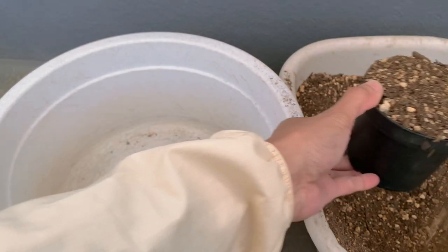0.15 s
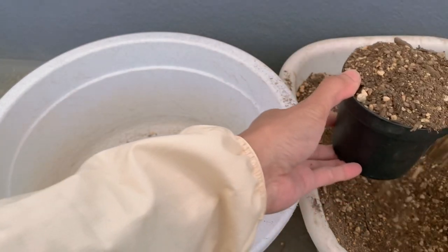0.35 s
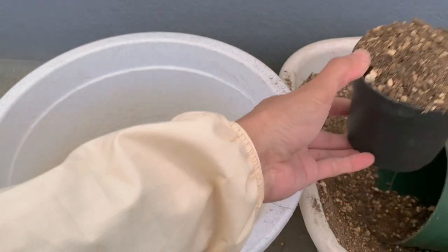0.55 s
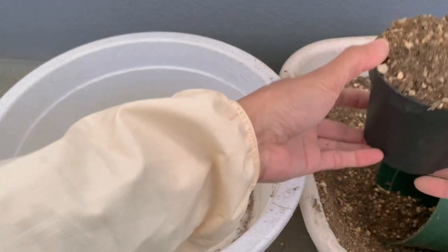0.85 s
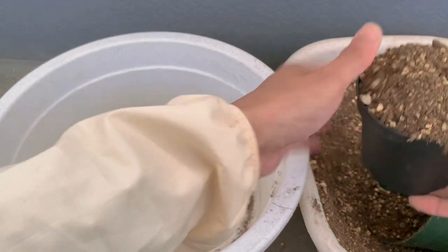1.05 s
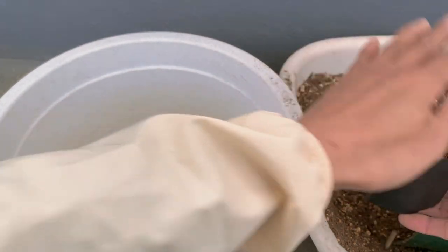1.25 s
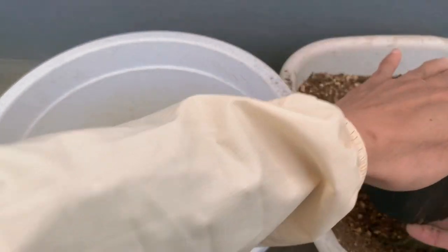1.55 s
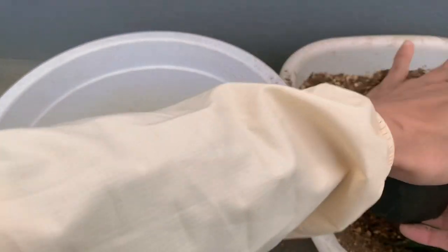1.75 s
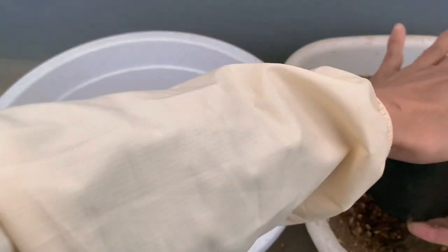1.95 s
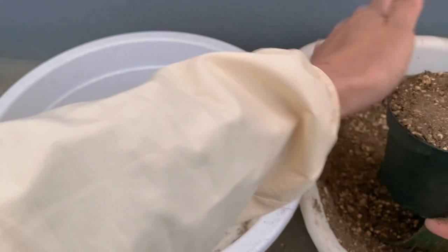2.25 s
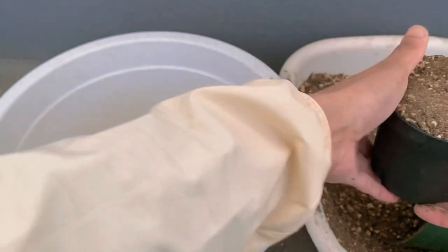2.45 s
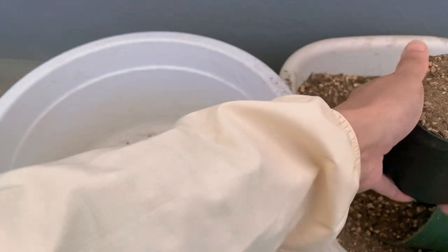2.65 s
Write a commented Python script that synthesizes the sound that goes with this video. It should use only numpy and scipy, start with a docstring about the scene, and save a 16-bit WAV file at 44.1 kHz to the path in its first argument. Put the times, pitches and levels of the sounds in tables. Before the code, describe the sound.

Dry soil slides and ticks against a hollow plastic pot, the pot is knocked softly, then after a lull sharp grit cracks and muffled hand rubs come thickly before fading; heard close, slightly right, in a small room.

```python
"""Potting mix pressed into a pot

Gritty potting mix is scooped into a small plastic pot and pressed down by hand, in a small room.
Grit cracks and scrapes as short bursts of random clicks, coloured by the pot's resonances and heard from
the right. Soil slides are swelling streams of tiny clicks with pitched pebble ticks. The scoop bumps the
pot once: dying sine waves. Filtered noise and wavering low tones make the rubs, the arm, the hum and the air.
"""
import sys
import numpy as np
from scipy import signal
from scipy.fft import rfft, irfft, next_fast_len
from scipy.io import wavfile
from scipy.ndimage import map_coordinates

SR = 44100
rng = np.random.default_rng(int(sys.argv[2]) if len(sys.argv) > 2 else 0)


def put_to_file(sound):
    """Save the sound as 16-bit audio at rate SR, in the file named by the first command-line argument."""
    columns = np.atleast_2d(sound).T  # one column per channel
    safe = np.clip(columns, -1, 1)
    whole_steps = np.round(safe * 32767)
    wavfile.write(sys.argv[1], SR, whole_steps.astype(np.int16))


N = 123479  # samples, 2.8 s


def amp(db):
    """Decibels to gain."""
    return 10 ** (np.asarray(db) / 20)


def unit(x):
    """Scale to an rms of 1."""
    return x / np.sqrt(np.mean(x ** 2) + 1e-20)


def along(points, hz):
    """Read a table of (Hz, value) points on a log frequency axis."""
    f, v = np.transpose(points)
    return np.interp(np.log(hz + 1), np.log(f + 1), v)


def curve(rows):
    """Turn (seconds, value) points into one value per sample."""
    return np.interp(np.arange(N) / SR, *np.transpose(rows))


def wobble(rate):
    """A smooth random curve through `rate` random points a second."""
    return map_coordinates(rng.standard_normal(1024), [np.arange(N) * rate / SR], mode="wrap")


def random_sizes(shape):
    """Bell-shaped random numbers, limited to -2..2."""
    return np.clip(rng.standard_normal(shape), -2, 2)


def decay(t, t60):
    """Die away by 60 dB in t60 seconds."""
    return np.exp(-np.log(1000) * t / t60)


def filtered(x, response):
    """Multiply the spectrum of x by a response given as a function of Hz."""
    n = x.shape[-1]
    padded = 2 * next_fast_len(n // 2 + 2048)
    hz = np.fft.rfftfreq(padded, 1 / SR)
    return irfft(rfft(x, padded) * response(hz), padded)[..., :n]


def coloured(x, tone_db):
    """Filter with the gain tone_db(hz), sounding only after each click and never before it."""
    def response(hz):
        # Folding the cepstrum forward in time gives the minimum-phase filter.
        cepstrum = irfft(tone_db(hz) * np.log(10) / 20)
        half = len(cepstrum) // 2
        cepstrum[1:half] *= 2
        cepstrum[half + 1:] = 0
        return np.exp(rfft(cepstrum))
    return filtered(x, response)


def add(track, s, sound):
    """Mix a sound into the track at time s."""
    i = max(0, round(s * SR))
    track[..., i:i + sound.shape[-1]] += sound[..., :max(0, N - i)]


SWELL_EDGE = 2.76  # how steeply a swell starts and ends


def swell(s, half):
    """A smooth rise and fall that peaks at time s and is at half height `half` seconds away."""
    return 1 / (1 + np.abs((np.arange(N) / SR - s) / half) ** SWELL_EDGE)


# Resonances of the plastic pot. Each row: pitch in Hz, width in Hz, lift (or cut, if negative) in dB.
POT_RESONANCES = [(437, 94, 8.5), (979.5, 24, 6.5), (1214, 97, 4), (1800, 52, 4.5), (1930, 110, 1.5),
                  (4850, 760, -1.5), (5644, 950, -8.5), (10030, 1100, 7.5)]


def pot_db(hz):
    """The pot's walls and hollow strengthen some pitches and weaken others."""
    return sum(db / (1 + (2 * (hz - f) / width) ** 2) for f, width, db in POT_RESONANCES)


# Grit cracking on plastic. Each row: start in seconds, level in dB before CRACK_DB, swell time in seconds,
# lift of the hollow body in dB, lift of the top in dB, pitch of the snap in Hz.
CRACK_EVENTS = [(.034, -28, 0.00028, -2, -35, 4780), (0.194, -38, 0.0012, 15, 8, 1260),
                (.203, -34, 0.00088, 18.5, 5, 1690), (0.2422, -23, 0.00087, 10, 0.5, 1100),
                (0.311, -34.5, 0.0054, 5, -3, 950), (0.4284, -9, 0.0042, -5.5, 1, 6000),
                (.4365, -15, .0018, 3.5, -8, 1230), (0.5287, -30.5, 0.00099, 8, -27, 5770),
                (.545, -46, 0.00041, -5, -15, 10900), (0.635, -37, 0.0065, 1, 7, 6500),
                (0.8973, -36, 0.00037, -28, 3, 10900), (1.2267, -11, 0.0006, -12, 6, 7200),
                (1.268, -23.5, 0.0009, -1.5, -2.5, 10600), (1.4351, -14, 0.00088, -2, 12.5, 6440),
                (1.4376, -27.5, 0.0016, 13.5, 2, 1000), (1.4794, -26.5, 0.00031, -2, 6, 10100),
                (1.4849, -22.5, 0.0013, 3, 0.5, 4040), (1.538, -29, 0.00016, -2, 2.5, 12500),
                (1.560, -26.5, 0.00072, -5.5, -1, 2010), (1.5744, -27, 0.00069, -10, -21, 11000),
                (1.59, -24, 0.00024, -8, 5, 11700), (1.605, -23, 0.00071, -4.5, -37, 3030),
                (1.7435, -25.5, 0.00042, -4, -17.5, 10600), (1.82, -26, 0.00095, -1, 4, 4600),
                (1.8629, -17, 0.0015, 4.5, -6, 1060), (1.8695, -14.5, 0.0015, 2.5, 0.5, 2800),
                (1.904, -18.5, 0.0004, -39, -3.5, 7100), (1.9273, -18.5, 0.0002, -56, -9, 9800),
                (1.956, -31, 0.0045, 3.5, 3, 2300), (2.061, -23.5, 0.00034, -5, 3, 12330),
                (2.165, -15, 0.00028, -3, 5, 7600), (2.222, -21, 0.0013, -7.5, 3.5, 3400),
                (2.228, -27, 0.00086, -26, 1, 9900), (2.241, -18.5, 0.0023, -13, -3.5, 6750),
                (2.2485, -21, 0.0005, -4.5, 3, 6500), (2.258, -22, 0.002, -40, 1.5, 6400),
                (2.325, -19, 0.0033, -7.5, -5, 10400), (2.336, -7.5, 0.001, -14.5, 0, 5500),
                (2.385, -25, 0.0013, -12, 1, 5950), (2.4193, -18, 0.00082, -8.5, -8, 8800),
                (2.4696, -16, 0.0016, -6, 8, 2000), (2.5331, -7.5, 0.00012, -23, 6, 5700),
                (2.674, -41.5, 0.00086, -22, 2, 6740)]
# Tone shared by all cracks. Each row: frequency in Hz, gain in dB.
CRACK_COLOUR = [(150, -14), (350, -4.5), (750, -4), (1100, -2.5), (2500, 0.5), (4000, 4.5), (6000, 4.5),
                (8500, -6.5), (11500, -4.5), (14500, -2), (16000, -17.5)]
CRACK_DB = 0.5
BODY_HZ, TOP_HZ = 2590, 8570  # the body lies below the first, the top above the second
SNAP_DB, SNAP_OCTAVES = 8, 0.17  # lift around the snap pitch, and its half width
FADE_S, FADE_PER_SWELL = 0.0011, 0.84  # a slower crush also dies more slowly
FRACTURE_SHARE = 0.21  # share of a burst's energy given to its main fracture, before shaping the tone
FRACTURE_SPREAD_DB = 3  # scatter in size of the tiny fractures


def cracks():
    """Tiny fractures swell to one main fracture and die in milliseconds, each crack with its own echoes."""
    out = np.zeros((2, N))
    t = np.arange(2048) / SR
    for s, db, rise, body_db, top_db, snap_hz in CRACK_EVENTS:
        fade = np.exp(-np.maximum(t - rise, 0) / (FADE_S + FADE_PER_SWELL * rise))
        shape = np.minimum(t / rise, fade)
        signs = np.sign(rng.standard_normal(len(t)))
        burst = shape * signs * amp(FRACTURE_SPREAD_DB * random_sizes(len(t)))
        burst *= np.sqrt(1 - FRACTURE_SHARE) / np.linalg.norm(burst)
        burst[np.argmax(shape)] = np.sqrt(FRACTURE_SHARE)
        burst *= np.linalg.norm(shape)

        def tone_db(hz):
            body = body_db / (1 + (hz / BODY_HZ) ** 4)
            top = top_db * (1 - 1 / (1 + (hz / TOP_HZ) ** 6))
            octaves_away = np.log2((hz + 1) / snap_hz)
            snap = SNAP_DB / (1 + (octaves_away / SNAP_OCTAVES) ** 2)
            return along(CRACK_COLOUR, hz) + pot_db(hz) + body + top + snap

        add(out, s, amp(db + CRACK_DB) * placed(coloured(burst, tone_db)))
    return out


GRAINS_PER_S, GRAIN_SPREAD_DB = 2000, 5


def grains():
    """Countless tiny collisions of widely varying size, as clicks at random moments."""
    hit = rng.random(N) < GRAINS_PER_S / SR
    signs = np.sign(rng.standard_normal(N))
    return hit * signs * amp(GRAIN_SPREAD_DB * random_sizes(N))


# Soil sliding and tumbling. Each row: peak time in seconds, level in dB before SLIDE_DB,
# half length in seconds, drumming on the pot in dB relative to the rustle.
SLIDE_EVENTS = [(.005, -44, 0.022, -3.5), (0.23, -47, 0.063, 3.5), (0.257, -47.5, 0.0058, -0.5),
                (0.305, -45.5, 0.014, -8.5), (0.471, -43.5, 0.038, -0.5), (0.559, -62, 0.02, 4),
                (0.651, -43.5, 0.015, -1), (0.706, -60, 0.027, 1), (0.791, -45.5, .025, -8.5),
                (0.849, -49.5, 0.0062, -1), (0.932, -45.5, 0.011, -25), (1.153, -52, 0.038, -6.5),
                (1.24, -44, 0.035, -5), (1.468, -46, 0.049, -3), (1.614, -48.5, 0.03, -9),
                (1.699, -43.5, 0.015, -2.5), (1.847, -47.5, 0.057, -2), (1.965, -44, 0.0143, -3),
                (2.186, -45.5, 0.086, -7.5), (2.253, -46.5, 0.037, -12.5), (2.344, -41.5, 0.034, -13.5),
                (2.456, -45, 0.062, -5), (2.552, -47.5, .024, -2.5)]
# Tone of grain rubbing on grain. Each row: frequency in Hz, gain in dB.
RUSTLE_COLOUR = [(300, -18.5), (800, -20), (1800, -10), (3000, -1), (6000, 0), (10500, -12), (14500, -0.5),
                 (16000, -30.5)]
# Tone of grains drumming on the pot. Each row: frequency in Hz, gain in dB.
DRUM_COLOUR = [(200, 5.5), (500, -12), (750, -10.5), (1100, 2), (1900, 6), (3000, -0.5), (8000, -10)]
SLIDE_DB = -2.5  # applies to rustle and drumming, not to the pebbles
CLUMP_DB = 2.5  # random rise and fall of the flow


def slides():
    """Dry grains rustle over one another in clumps and drum on the hollow pot; pebbles tumble along."""
    flow = sum(amp(db) * swell(s, half) for s, db, half, _ in SLIDE_EVENTS)
    fall = sum(amp(db + drum_db) * swell(s, half) for s, db, half, drum_db in SLIDE_EVENTS)
    rustle = unit(coloured(grains(), lambda hz: along(RUSTLE_COLOUR, hz) + pot_db(hz) / 2))
    drum = unit(coloured(grains(), lambda hz: along(DRUM_COLOUR, hz) + pot_db(hz)))
    fine = (flow * rustle + fall * drum) * amp(SLIDE_DB + CLUMP_DB * wobble(90))
    coarse = np.hypot(flow, fall) * pebbles()
    return placed(fine + coarse)[:, :N]


PEBBLES_PER_S, PEBBLE_DB, PEBBLE_SPREAD_DB = 160, 17, 3.8  # level before the tone filter
PEBBLE_HZ, PEBBLE_OCTAVES = 3600, 0.7  # middle pitch and its scatter
PEBBLE_CYCLES = 1.3  # cycles in which a tick falls to about a third


def pebbles():
    """Coarser bits of grit tick one by one, each a very short ring at its own pitch."""
    out = np.zeros(N)
    t = np.arange(256) / SR
    count = round(PEBBLES_PER_S * N / SR)
    times = rng.random(count) * N / SR
    for s, (pitch, size) in zip(times, random_sizes((count, 2))):
        hz = PEBBLE_HZ * 2 ** (PEBBLE_OCTAVES * pitch)
        ring = np.sin(2 * np.pi * hz * t) * np.exp(-hz * t / PEBBLE_CYCLES)
        tick = np.sqrt(hz / PEBBLE_HZ) * ring
        add(out, s, amp(PEBBLE_DB + PEBBLE_SPREAD_DB * size) * tick)

    def tone_db(hz):
        less_bass = 20 * np.log10((hz + 10) / (hz + PEBBLE_HZ / 2))
        return pot_db(hz) / 2 + less_bass

    return coloured(out, tone_db)


# Ringing tones of the bumped pot. Each row: pitch in Hz, level in dB relative to THUMP_DB,
# time to die by 60 dB in seconds.
THUMP_RINGS = [(153.5, 6.5, 0.042), (195.7, 7, 0.035), (256, -12.5, 0.17), (416.5, -11.5, 0.12)]
THUMP_S, THUMP_DB, THUMP_ATTACK_S = 0.4403, -11, 0.0032
SWAY_S, SWAY_HZ, SWAY_DB, SWAY_T60 = 0.494, 70, -13, 0.13  # the pot rocks after the bump


def thumps():
    """The scoop bumps the full pot, which rings dully, then rocks briefly: dying sine waves."""
    out = np.zeros(N)
    t = np.arange(SR // 2) / SR

    def ring(hz, t60, attack):
        onset = 1 - np.exp(-(t / attack) ** 2)
        return np.sin(2 * np.pi * hz * t) * decay(t, t60) * onset

    for hz, level, t60 in THUMP_RINGS:
        add(out, THUMP_S, amp(THUMP_DB + level) * ring(hz, t60, THUMP_ATTACK_S))
    add(out, SWAY_S, amp(SWAY_DB) * ring(SWAY_HZ, SWAY_T60, 1 / SWAY_HZ))
    return out


# Soft rubs of hand and sleeve on soil and pot. Each row: peak time in seconds, level in dB,
# half length in seconds, pitch in Hz.
RUB_EVENTS = [(0.22, -48, 0.074, 442), (1.094, -52.5, 0.026, 420), (1.43, -49, 0.097, 428),
              (1.638, -49.5, 0.05, 409), (1.776, -43, 0.069, 196.4), (1.983, -46, 0.15, 184.6),
              (2.085, -54, 0.084, 420), (2.482, -52, 0.14, 435)]
RUB_Q = 5.25  # higher is a narrower band


def rubs():
    """The palm presses the soil and the sleeve brushes the pot: muffled swells of narrow-band noise."""
    out = np.zeros(N)
    for s, db, half, pitch in RUB_EVENTS:
        def band(hz):
            return 1 / (1 + 1j * RUB_Q / 2 * (hz / pitch - pitch / (hz + 1))) ** 2
        noise = unit(filtered(rng.standard_normal(N), band))
        out += amp(db) * swell(s, half) * noise
    return out


def rumble(tone, side_db):
    """Nearly central stereo noise of rms 1: one shared noise plus a weaker one that differs by side."""
    mid, side = filtered(rng.standard_normal((2, N)), lambda hz: amp(along(tone, hz)))
    side = amp(side_db) * side
    return unit(np.array([mid + side, mid - side]))


# Loudness of the moving arm. Each row: time in seconds, level in dB before ARM_DB.
ARM_LEVEL = [(0, -46.5), (.25, -54.5), (.55, -45), (.85, -46), (1.1, -50), (1.5, -47.5), (2.0, -45.5),
             (2.2, -54), (2.8, -58)]
# Tone of the arm's rumble. Each row: frequency in Hz, gain in dB.
ARM_COLOUR = [(40, -31), (80, 11), (115, 4), (200, -5.5), (300, -35.5), (700, -55), (1500, -93)]
ARM_DB = 5.5


def arm():
    """The moving arm and sleeve rumble softly: low noise that rises and falls."""
    return rumble(ARM_COLOUR, side_db=-9) * amp(curve(ARM_LEVEL) + ARM_DB)


# Loudness of the low hum. Each row: time in seconds, level in dB before HUM_DB.
HUM_LEVEL = [(0, -44), (.12, -31.5), (.4, -39.5), (.7, -37), (.92, -29.5), (1.15, -38), (1.85, -38.5),
             (2.05, -38.5), (2.35, -44.5), (2.8, -43.5)]
HUM_HZ, HUM_DB = 51.85, -2.5
HUM_WANDER_HZ, HUM_WAVER_DB = 2.925, 2.5  # random drift of pitch and of level
DRONE_S, DRONE_HALF_S, DRONE_HZ, DRONE_DB = 1.26, 0.37, 118.7, -43.5


def hums():
    """A sine hum wavers in pitch and level, and a second low tone swells while the pot is moved."""
    def tone(hz):
        cycles = np.cumsum(hz + HUM_WANDER_HZ * wobble(15)) / SR
        return unit(np.sin(2 * np.pi * cycles)) * amp(HUM_WAVER_DB * wobble(11.2))

    hum = tone(HUM_HZ) * amp(curve(HUM_LEVEL) + HUM_DB)
    drone = tone(DRONE_HZ) * amp(DRONE_DB) * swell(DRONE_S, DRONE_HALF_S)
    return hum + drone


# Tone of the still air in the room. Each row: frequency in Hz, gain in dB.
AIR_COLOUR = [(20, -4.5), (60, -4), (200, 7), (480, -3), (750, -18.5), (2000, -14), (6000, -19),
              (16000, -29.5)]
AIR_DB = -53


def background():
    """The arm and low tones, 1 dB up on the left and 1 dB down on the right, over steady noise of still air."""
    low = (arm() + hums()) * amp([[1], [-1]])
    return low + amp(AIR_DB) * rumble(AIR_COLOUR, side_db=-2)


# Echo length in the room. Each row: frequency in Hz, time to die by 60 dB in seconds.
ECHO_T60 = [(200, 0.75), (800, 0.22), (2000, 0.13), (5500, 0.12), (14000, .16)]
# Echo strength. Each row: frequency in Hz, level in dB.
ECHO_LEVEL = [(200, -6.5), (1000, -7.5), (2500, -5), (6000, -4.5), (14000, -13.5)]
# Head start of the right microphone. Each row: frequency in Hz, lead over the left in seconds.
RIGHT_LEAD = [(1500, 0.000085), (8000, 0.0001773)]
ROOM_DELAY_S = 0.006
POT_T60, POT_ECHO_DB = 0.02, -6  # quick echoes inside the pot


def placed(x):
    """Direct sound reaches the right first, joined by quick pot echoes and a room tail of fading noise."""
    n = 10240
    hz, t, z = signal.stft(rng.standard_normal((2, n)), SR, nperseg=256)
    fade = decay(t, along(ECHO_T60, hz)[:, None])
    room = signal.istft(z * fade, SR, nperseg=256)[1]
    room = filtered(room / np.linalg.norm(room[0]), lambda f: amp(along(ECHO_LEVEL, f)))
    room = np.pad(room, ((0, 0), (round(ROOM_DELAY_S * SR), 0)))[:, :n]

    t = np.arange(n) / SR
    pot = rng.standard_normal((2, n)) * decay(t, POT_T60) * (t > 0.001)
    pot = amp(POT_ECHO_DB) * pot / np.linalg.norm(pot[0])
    echoes = signal.fftconvolve(x[None], room + pot, axes=1)

    def shift(f):
        # Half the lead delays the left, the other half advances the right.
        return np.exp(1j * np.pi * f * along(RIGHT_LEAD, f) * np.array([[-1], [1]]))

    direct = filtered(np.pad(x, (0, n - 1)), shift)
    return echoes + direct


# Balance of the soil sounds. Each row: frequency in Hz, dB that the right goes up and the left goes down.
RIGHT_BALANCE = [(300, -1.5), (1500, 0), (3000, 1), (5000, 2.5), (7000, 1.1), (9000, 0)]


def scene():
    """Cracks and slides, stronger on the right in the treble, with central thump and rubs over the background."""
    soil = filtered(cracks() + slides(), lambda hz: amp(along(RIGHT_BALANCE, hz) * np.array([[-1], [1]])))
    return soil + thumps() + rubs() + background()


CUT_HZ = 16100


def record(dry):
    """Clip peaks at full scale, then remove the treble above CUT_HZ with a very steep filter."""
    return filtered(np.clip(dry, -1, 1), lambda hz: 1 / np.sqrt(1 + (hz / CUT_HZ) ** 120))


dry = scene()
out = record(dry)
put_to_file(out)
```